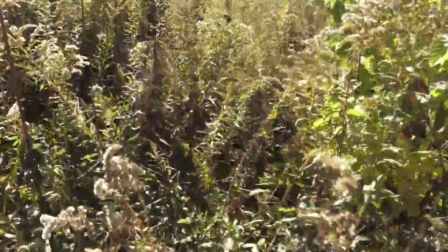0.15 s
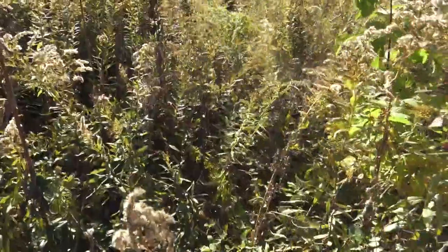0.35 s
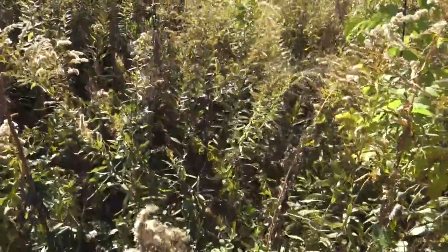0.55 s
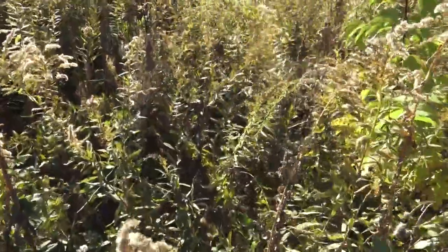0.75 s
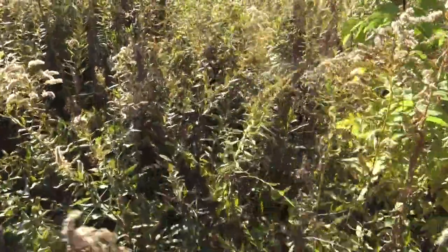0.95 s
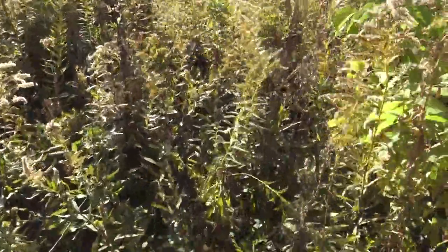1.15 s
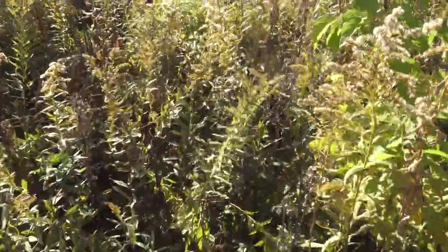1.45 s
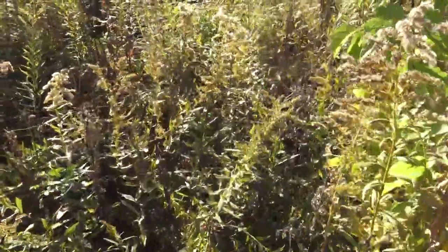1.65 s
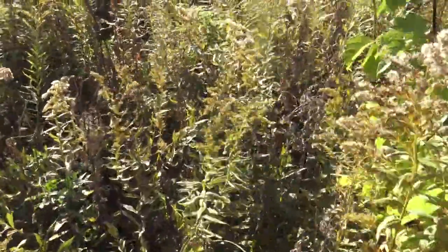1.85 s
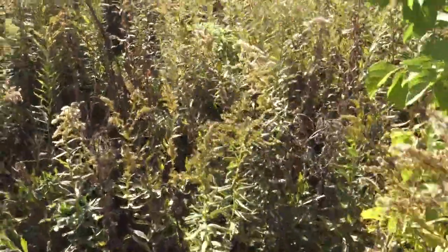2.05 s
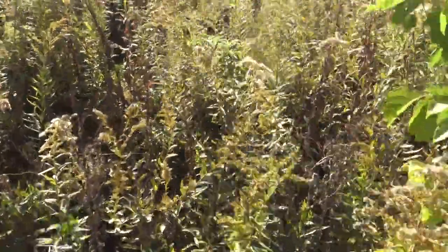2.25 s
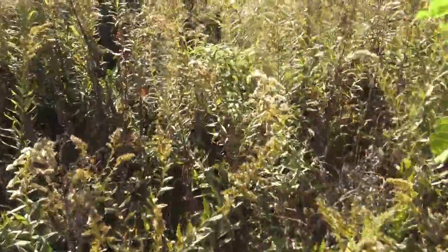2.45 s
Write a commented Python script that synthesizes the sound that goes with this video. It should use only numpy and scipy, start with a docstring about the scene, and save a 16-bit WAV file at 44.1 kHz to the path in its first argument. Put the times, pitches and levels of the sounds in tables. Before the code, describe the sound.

A hound close by bays three times, each a clean yelp cracking up into a high sliding howl; a second dog adds two short hoarse barks. Dry weeds rustle softly in open brush, with hardly any echo.

```python
"""Two beagles on a trail

Two beagles bay in dry brush, a few metres from someone walking through the weeds.
The first dog gives three long bays, each a clean yelp, a cracking voice and a high howl that slides away.
The second throws in two short hoarse barks. The voices are sums of wavering harmonics coloured by a throat.
Weeds swish, with a few short bright bursts and soft low swells: all of these are shaped noise."""
import sys
import numpy as np
from scipy import signal
from scipy.fft import rfft, irfft, next_fast_len
from scipy.io import wavfile

SR = 44100
rng = np.random.default_rng(int(sys.argv[2]) if len(sys.argv) > 2 else 0)


def generate_wav(signal):
    """Clip the signal to [-1, 1] and save it as 16-bit WAV at the path in sys.argv[1]."""
    frames = np.transpose(np.atleast_2d(signal))
    scaled = np.clip(frames, -1, 1) * 32767
    pcm = np.round(scaled).astype(np.int16)
    wavfile.write(sys.argv[1], SR, pcm)


N = 114660  # length of the scene in samples
MOUTH_HZ = 1665  # the mouth's resonance when wide open


def amp(db):
    """Turns decibels into gain."""
    return 10 ** (np.asarray(db) / 20)


def unit(x):
    """Scales a sound to rms 1."""
    return x / np.sqrt(np.mean(abs(x) ** 2) + 1e-20)


def colour_db(points, hz):
    """Reads a spectrum at the given frequencies, on a log-frequency axis."""
    point_hz, point_db = np.transpose(points)
    return np.interp(np.log(hz + 1), np.log(point_hz), point_db)


def coloured(x, points):
    """Filters a sound by a spectrum, then scales it to rms 1."""
    hz = np.fft.rfftfreq(len(x), 1 / SR)
    return unit(irfft(rfft(x) * amp(colour_db(points, hz)), len(x)))


def wander(size, rate_hz):
    """Smooth random motion, up to about rate_hz, cut from a longer stretch of rms 1."""
    n = next_fast_len(max(size, SR // 2))
    hz = np.fft.rfftfreq(n, 1 / SR)
    slow = rfft(rng.standard_normal(n)) / np.sqrt(1 + (hz / rate_hz) ** 8)
    return unit(irfft(slow, n))[:size]


def add(mix, start_s, sound):
    """Mixes a sound in at its start time."""
    part = mix[max(round(start_s * SR), 0):][:len(sound)]
    part += sound[:len(part)]


def controls(curve):
    """Spreads a curve out to its time and columns, sample by sample."""
    point_s, *columns = np.transpose(curve)
    point_s = np.maximum.accumulate(point_s)
    t = np.arange(point_s[0], point_s[-1], 1 / SR)
    return t, *[np.interp(t, point_s, column) for column in columns]


def weeds():
    """Dry leaves rub: a hiss with many tiny crackles, swelling and fading, a little different left and right."""
    # overall colour of the rubbing leaves: frequency_hz [Hz], level_db [dB per Hz]
    leaf_colour = [(30, -8), (400, 2.5), (1500, -3), (4000, -3), (7000, 1.5), (10000, 0.5), (12500, -4.5),
                   (16000, -7.5)]
    # how loud the brushing is over time: time_s [s], level_db [dB]
    swish_level = [(0, -52), (.12, -48.5), (.27, -53.5), (.8, -48), (.96, -44), (1.04, -47), (1.22, -51.5),
                   (1.7, -51), (2.35, -53.5), (2.499, -50)]
    crackles_per_s, crackle_db, crackle_spread_db = 570, -5.5, 6.5
    side_db = -12.5  # left-right difference against the middle, before its low-pass
    size = amp(crackle_spread_db * np.minimum(rng.exponential(1, N), 4))
    size *= rng.random(N) < crackles_per_s / SR
    crackle = unit(size * rng.choice([-1, 1], N))
    mid = coloured(rng.standard_normal(N) + amp(crackle_db) * crackle, leaf_colour)
    side = amp(side_db) * coloured(rng.standard_normal(N), leaf_colour)
    side = signal.sosfilt(signal.butter(8, 11000, fs=SR, output="sos"), side)
    level_db = np.interp(np.arange(N) / SR, *np.transpose(swish_level))
    return np.array([mid + side, mid - side]) * amp(level_db)


def voice(hz, level_db, overtones_db, half_db, rough, throat, mouth_db=0, mouth_hz=MOUTH_HZ,
          treble_db=0, slack_hz=1, count=2):
    """Vocal folds through a throat: harmonics, with lines between them when cycles repeat every count-th time.

    Roughness makes the lines shake."""
    jitter, drift = .015, .002  # pitch shake at full roughness; slower wobble (shares of the pitch)
    flutter_db, half_flutter_db = 1.3, 3.2  # level wander of harmonics (more for high ones) and of lines between
    quarter_db = -7  # quarter lines against half lines
    ragged_hz, ragged_share = 4400, .15  # around and above here lines fray and lines between grow equal
    mouth_width_hz, treble_hz = 200, 3340
    slack_db = 23.5  # loss in slack folds, for each harmonic above the second
    edge_s = .005  # fade in and out
    n = len(hz)
    pitch_shake = jitter * rough * wander(n, 200) + drift * wander(n, 60)
    turns = np.cumsum(hz * (1 + pitch_shake)) / SR
    slack = np.clip(1 - hz / slack_hz, 0, 1)  # folds slacken below slack_hz
    out = np.zeros(n)
    for k in np.arange(1, 11 * count) / count:  # line number, as a multiple of the pitch
        between, is_quarter = k % 1 > 0, k % .5 > 0
        line_hz = k * hz
        ragged = 1 / (1 + (ragged_hz / line_hz) ** 10)
        db = colour_db(throat, line_hz) + overtones_db * np.clip(k - 1, 0, 1)
        db += between * half_db * (1 - ragged) + is_quarter * quarter_db
        db += mouth_db * np.exp(-((line_hz - mouth_hz) / mouth_width_hz) ** 2)
        db += treble_db / (1 + (treble_hz / line_hz) ** 10)
        db -= slack_db * slack * max(k - 2, 0)
        flutter = half_flutter_db if between else flutter_db * min(k - 1, 3) ** 2 / 3
        db += flutter * wander(n, 25)
        # part of each line turns into a narrow band of noise
        smear = np.clip(rough * k * (1 + between * min(k, 1)) + ragged_share * ragged, 0, 1)
        shake_hz = 90 + 25 * k
        shake = (wander(n, shake_hz) + 1j * wander(n, shake_hz)) / np.sqrt(2)
        line = np.sqrt(1 - smear ** 2) + smear * shake
        out += amp(db) * (line * np.exp(2j * np.pi * (k * turns + rng.random()))).real
    from_ends = np.minimum(np.arange(n), np.arange(n)[::-1])
    edge = np.minimum(from_ends / (edge_s * SR), 1)
    return np.sqrt(2) * out * amp(level_db) * np.sin(edge * np.pi / 2)


def air(level_db):
    """Air rushing through the folds: coloured noise on a level curve."""
    # colour of the rushing air: frequency_hz [Hz], level_db [dB per Hz]
    air_colour = [(400, -31), (680, 3.5), (1000, -22), (1900, -2), (4200, -32.5)]
    return coloured(rng.standard_normal(SR), air_colour)[:len(level_db)] * amp(level_db)


def muzzle(t, bay_start_s):
    """The opening mouth: its resonance (Hz) slides down as a bay begins; also gives the treble level (dB)."""
    # boost or cut of the first dog's treble: time_s [s], level_db [dB]
    treble_level = [(1, -13), (1.45, -8), (1.8, 0), (1.93, 5), (2.17, 2), (2.26, -2)]
    start_hz, open_s = 2590, 0.076
    resonance_hz = np.interp(t - bay_start_s, [0, open_s], [start_hz, MOUTH_HZ])
    return resonance_hz, np.interp(t, *np.transpose(treble_level))


def yelp(curve, bay_start_s):
    """The folds swing evenly, which gives a nearly pure tone with no lines between the harmonics."""
    # throat and mouth colour in a yelp: frequency_hz [Hz], level_db [dB]
    yelp_throat = [(400, -0.5), (820, 0), (1000, -4), (1400, -23.5), (1650, -20.5), (2050, -19),
                   (2450, -30), (2700, -35.5), (2950, -22.5), (3300, -42), (4000, -50), (9000, -49)]
    rough, mouth_db, slack_hz = .012, 8, 670
    t, hz, db, overtones_db = controls(curve)
    return voice(hz, db, overtones_db, 0, rough, yelp_throat, mouth_db, *muzzle(t, bay_start_s),
                 slack_hz, count=1)


def crack(curve, bay_start_s, mouth_db, rough):
    """The cycles repeat only in fours, so half and quarter lines make a rasp."""
    # throat and mouth colour in a crack: frequency_hz [Hz], level_db [dB]
    crack_throat = [(300, -14), (560, -1), (660, 0), (760, 8), (920, -4), (1220, -6), (1480, -12),
                    (1800, -6), (2100, -14), (2450, -16), (3050, -23), (3500, -45), (9000, -52)]
    half_db, low_hz = -12, 500  # half lines; the mouth radiates little of the rasp below low_hz
    t, hz, db, overtones_db = controls(curve)
    rasp = voice(hz, db, overtones_db, half_db, rough, crack_throat, mouth_db,
                 *muzzle(t, bay_start_s), count=4)
    return signal.sosfilt(signal.butter(5, low_hz, "high", fs=SR, output="sos"), rasp)


def howl(curve, bay_start_s, mouth_db):
    """The folds leap to a high pitch; the howl is airier where its cycles are uneven (strong half lines)."""
    # throat and mouth colour in a howl: frequency_hz [Hz], level_db [dB]
    howl_throat = [(250, -25), (560, -1.5), (1050, 0), (1700, 1), (2400, 5), (2750, -13), (3170, -22),
                   (3450, -29.5), (4200, -36), (4400, -25), (4800, -38), (7800, -35), (9500, -54)]
    # moments where a howl catches: time_s [s], half_length_s [s], added_roughness [0-1]
    catches = [(.366, .012, .12), (.657, .014, .22), (1.18, .012, .12), (1.395, .01, .14)]
    base_rough, slack_hz = .018, 1004
    air_db = -17  # against the howl's level, before half the level of the half lines is added
    t, hz, db, overtones_db, half_db = controls(curve)
    rough = base_rough + sum(r * np.exp(-((t - at) / width) ** 2) for at, width, r in catches)
    tone = voice(hz, db, overtones_db, half_db, rough, howl_throat, mouth_db, *muzzle(t, bay_start_s),
                 slack_hz)
    return tone, air(db + air_db + half_db / 2)


def first_dog():
    """Three bays: the voice goes from yelp to crack to a howl almost an octave higher."""
    # the voice before throat colour, one curve per yelp:
    # time_s [s], pitch_hz [Hz], level_db [dB], overtones_db [dB]
    yelp_curves = [
        [(.188, 440, -44, 4), (.198, 570, -32, -2), (.207, 690, -15, -15), (.226, 735, -13, -14),
         (.251, 665, -16, -1), (.279, 672, -13.5, -4), (.313, 668, -15.5, -5)],
        [(.992, 500, -46, 8), (1.005, 630, -32, 3), (1.017, 795, -18, 0), (1.031, 775, -13, -5),
         (1.057, 680, -13.5, 0), (1.115, 679, -15.5, 1)],
        [(1.792, 640, -38, 8), (1.8, 770, -25, 6), (1.809, 825, -17, 5), (1.823, 783, -13, 1),
         (1.848, 700, -14, 2), (1.871, 680, -16.5, 3)],
    ]
    # the same columns, one curve per crack of the voice
    crack_curves = [
        [(.307, 655, -17, -14), (.349, 622, -17, -10), (.356, 595, -25.5, -3), (.382, 575, -38, 1)],
        [(1.11, 640, -19, -5), (1.13, 612, -20.5, 1), (1.173, 608, -21.5, 3), (1.186, 580, -32, -3)],
        [(1.865, 680, -22, -5), (1.88, 642, -19.5, -5), (1.897, 590, -24, -1), (1.909, 530, -38, 5)],
    ]
    # the same columns and half_lines_db [dB], one curve per howl
    howl_curves = [
        [(.348, 1125, -33, -12, 9), (.39, 1127, -26, -8.5, -13), (.43, 1145, -29, -10.5, -4),
         (.515, 1041, -37, -1.5, -3), (.575, 1150, -30.5, 1, -12), (.64, 1162, -28, -12, -3.5),
         (.652, 1112, -28, -21, 2.5), (.695, 1127, -40, -20, 3), (.717, 533, -32.5, -5.5, -51),
         (.738, 234, -34.5, -16, -32)],
        [(1.172, 1125, -28.5, -3.5, -33), (1.2, 1115, -28, -2.5, -12.5), (1.235, 1154, -25, -10, -15),
         (1.285, 1142, -23.5, -6.5, -13), (1.395, 1094, -26, -26, -13.5), (1.425, 1102, -27, -18, -41),
         (1.475, 1134, -26, -26, -30), (1.495, 1133, -29.5, -28, -36), (1.503, 893, -39.5, 3.5, -27),
         (1.514, 587, -25, -15.5, -25), (1.524, 522, -28, 9, -21)],
        [(1.888, 995, -28, -5, -19), (1.912, 1040, -30.5, -6, -8), (2.01, 1068, -20.5, -8, -21.5),
         (2.075, 1046, -24.5, -8.5, -20.5), (2.15, 1070, -20.5, -12.5, -27.5), (2.205, 1103, -24.5, -9.5, -28),
         (2.24, 1065, -27.5, 2.5, -47), (2.28, 1082, -22.5, -4.5, -50), (2.354, 1206, -35.5, -6.5, -37),
         (2.363, 1016, -47.5, -14, -33), (2.378, 566, -35, -13.5, -11), (2.4, 239, -41.5, -21, -19.5)],
    ]
    # height of the mouth's resonance, one value per howl [dB]
    howl_mouths_db = [-5.5, -7.5, 12]
    # height of the mouth's resonance, one value per crack [dB]
    crack_mouths_db = [13, 1, 10]
    # roughness, one value per crack [0-1]
    crack_roughs = [.12, .06, .16]
    out = np.zeros(N)
    bays = zip(yelp_curves, crack_curves, howl_curves, howl_mouths_db, crack_mouths_db, crack_roughs)
    for yelp_curve, crack_curve, howl_curve, howl_mouth_db, crack_mouth_db, crack_rough in bays:
        bay_start_s = yelp_curve[0][0]
        add(out, bay_start_s, yelp(yelp_curve, bay_start_s))
        add(out, crack_curve[0][0], crack(crack_curve, bay_start_s, crack_mouth_db, crack_rough))
        for sound in howl(howl_curve, bay_start_s, howl_mouth_db):
            add(out, howl_curve[0][0], sound)
    return out


def field(x):
    """The brush scatters a short echo, different left and right: noise that dies away."""
    t60_s = .2  # time to fall by 60 dB
    t = np.arange(SR // 2) / SR
    tail = rng.standard_normal((2, len(t))) * amp(-60 * t / t60_s)
    return signal.fftconvolve(x[None], tail / np.linalg.norm(tail[0]), axes=1)[:, :N]


def low_swells():
    """Soft low swells of noise: some are steps, the first a low bump in a yelp, the third a rough patch in a howl."""
    # swells, level before the swell shape: start_s [s], length_s [s], centre_hz [Hz], level_db [dB]
    swell_list = [(0.218, 0.016, 174, -50.5), (0.784, 0.058, 378, -46), (1.382, 0.037, 472, -45),
                  (2.46, 0.14, 262, -58.5)]
    width_octaves = 0.41
    out = np.zeros(N)
    hz = np.fft.rfftfreq(SR, 1 / SR)
    for start_s, length_s, centre_hz, db in swell_list:
        octaves = np.log2((hz + 1) / centre_hz)
        band = 1 / (1 + (octaves / width_octaves) ** 2)
        band /= 1 + (hz / centre_hz / 4) ** 2  # softens the top further
        body = unit(irfft(rfft(rng.standard_normal(SR)) * band, SR))
        n = int(length_s * SR)
        add(out, start_s, amp(db) * unit(body[:n]) * np.hanning(n) * np.sqrt(2))
    return out


def bright_bursts():
    """Short bright bursts of noise that die quickly: the first is a tick inside the first yelp, with a low bump."""
    # bursts, level before the lift below: start_s [s], level_db [dB]
    burst_list = [(0.223, -49), (0.9425, -49), (0.9736, -40.5)]
    # colour of a burst: frequency_hz [Hz], level_db [dB]
    burst_colour = [(100, -4), (500, -16.5), (2500, -6), (7000, 6.5), (11000, 7), (16000, -1)]
    decay_s, lift_db = 0.0065, 9
    out, t = np.zeros(N), np.arange(SR // 40) / SR
    for start_s, db in burst_list:
        burst = coloured(rng.standard_normal(len(t)), burst_colour) * np.exp(-t / decay_s)
        add(out, start_s, amp(db + lift_db) * burst)
    return out


def second_dog():
    """Rough, airy folds: each bark starts on a squeak, drops, swells and turns hoarse."""
    # the voice before throat colour, one curve per bark:
    # time_s [s], pitch_hz [Hz], level_db [dB], overtones_db [dB], half_lines_db [dB]
    bark_curves = [
        [(1.514, 822, -20, -25, -21), (1.522, 797, -13.5, 13.5, -34), (1.528, 793, -18, 0, -35),
         (1.531, 534, -29, 14, -3.5), (1.547, 571, -21.5, 14.5, -33), (1.559, 617, -12.5, -8, -26),
         (1.569, 691, -11.5, -5, -27), (1.574, 596, -23.5, -2, -8.5), (1.612, 630, -19, -2, -4),
         (1.642, 605.5, -26, -2, -6.5), (1.663, 480, -37.5, -1, -18.5)],
        [(2.028, 824, -41, -8, -30), (2.038, 821, -23, -10, -15), (2.049, 529.4, -28.5, 11, -3.5),
         (2.065, 593, -20, 12.5, -52), (2.082, 651, -14, -13, -3.5), (2.11, 634, -20.5, -4.5, -7.5),
         (2.15, 664, -25, 2, 4.5), (2.172, 578, -27, -18, -21), (2.192, 483, -64, 6, 26)],
    ]
    # throat and mouth colour in a bark: frequency_hz [Hz], level_db [dB]
    bark_throat = [(310, -28.5), (500, -2.5), (940, -1.5), (1120, -13.5), (1250, -8.5), (1500, -32),
                   (1850, -32), (2400, -37), (3100, -55), (4500, -61)]
    rough, air_db = .09, -30  # roughness 0-1; air against the bark's level
    out = np.zeros(N)
    for curve in bark_curves:
        t, hz, db, overtones_db, half_db = controls(curve)
        tone = voice(hz, db, overtones_db, half_db, rough, bark_throat)
        add(out, t[0], tone + air(db + air_db))
    return out


def scene():
    """The dogs a little to the right with a faint echo, the weeds all around, swells and bursts in the middle."""
    balance_db, echo_db = -2, -31  # left against right; echo against the dogs
    dogs = first_dog() + second_dog()
    placed_dogs = dogs * amp([[balance_db / 2], [-balance_db / 2]])
    return placed_dogs + amp(echo_db) * field(dogs) + weeds() + low_swells() + bright_bursts()


def record(dry):
    """The recorder's band limit: a steep low-pass takes away the very highest treble."""
    cutoff_hz = 16550
    low_pass = signal.firwin(511, cutoff_hz, window=("kaiser", 9), fs=SR)
    return signal.oaconvolve(dry, low_pass[None], "same")


dry = scene()
out = record(dry)
generate_wav(out)
```